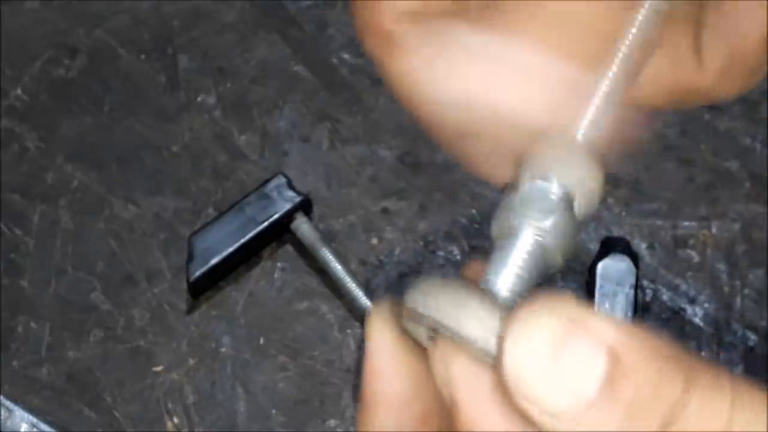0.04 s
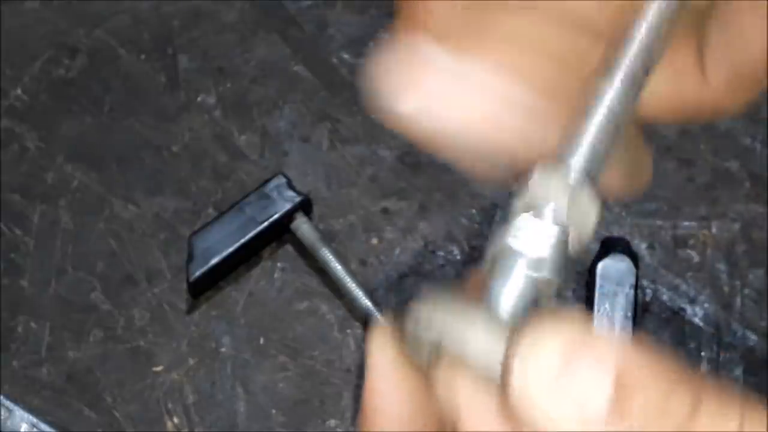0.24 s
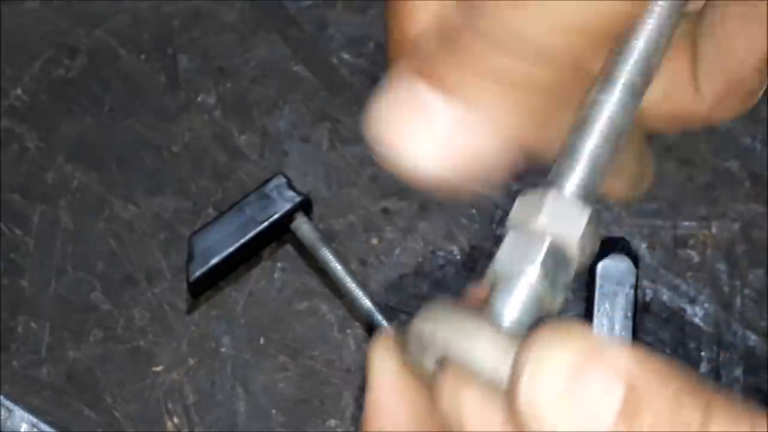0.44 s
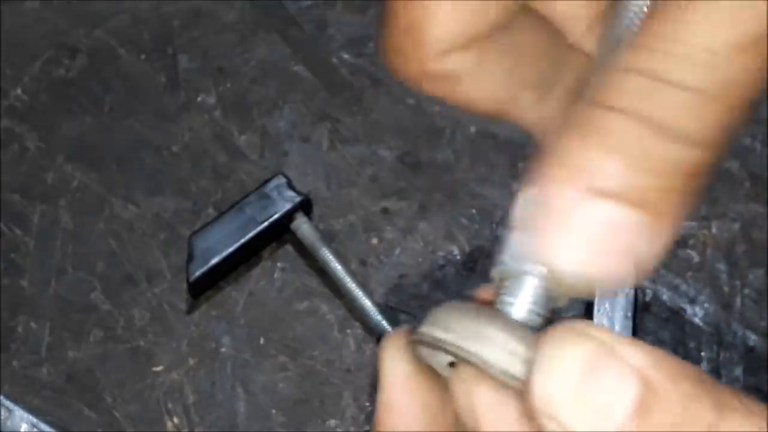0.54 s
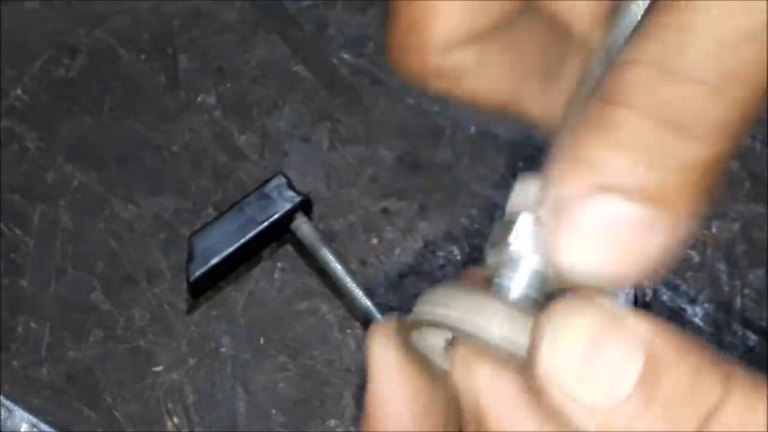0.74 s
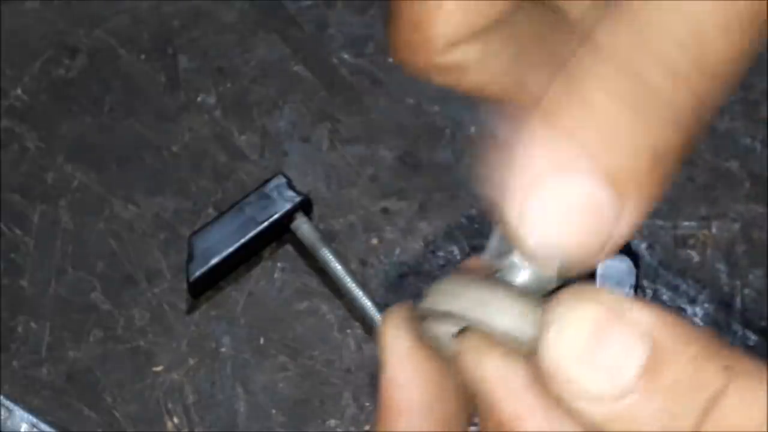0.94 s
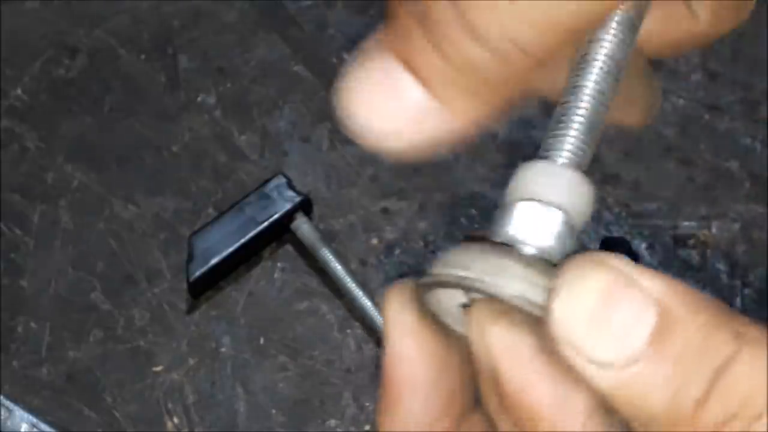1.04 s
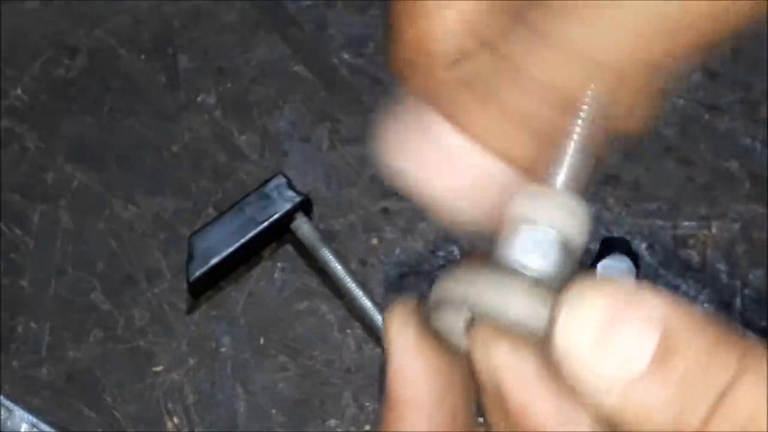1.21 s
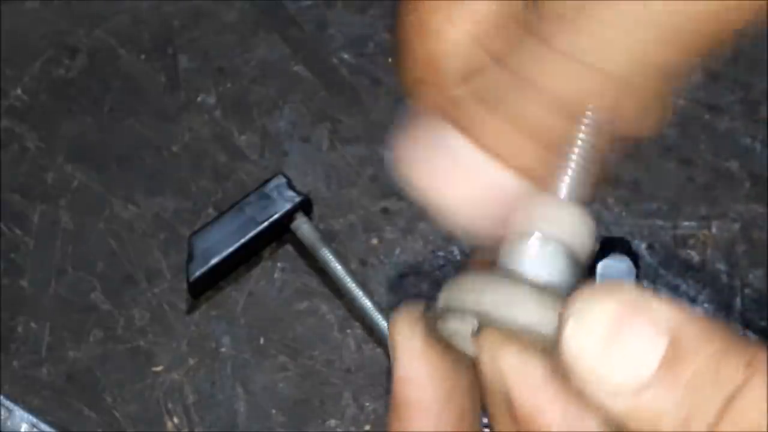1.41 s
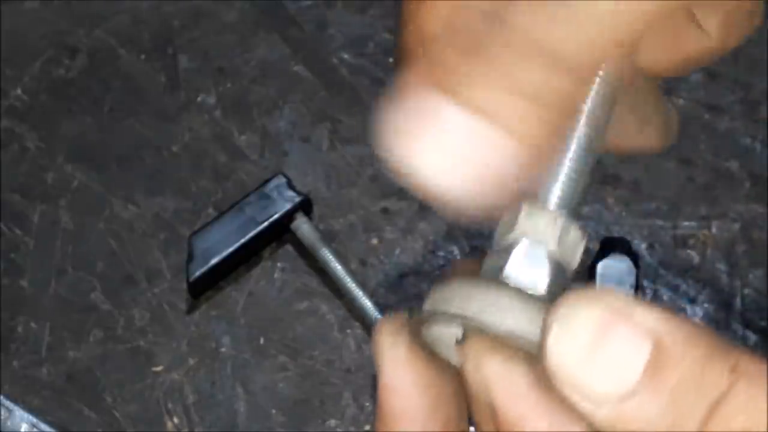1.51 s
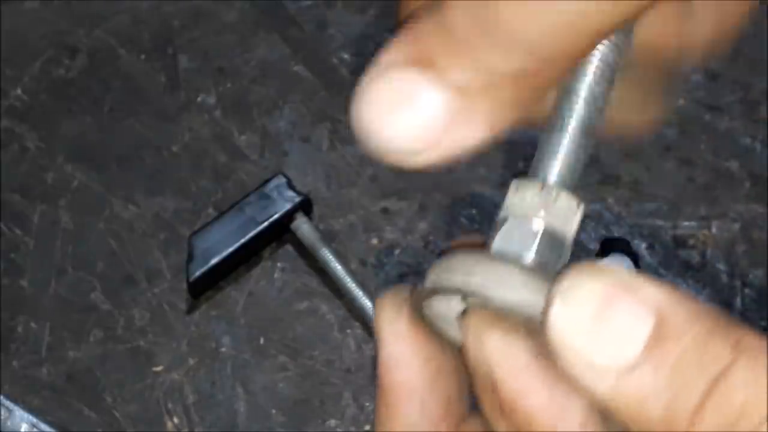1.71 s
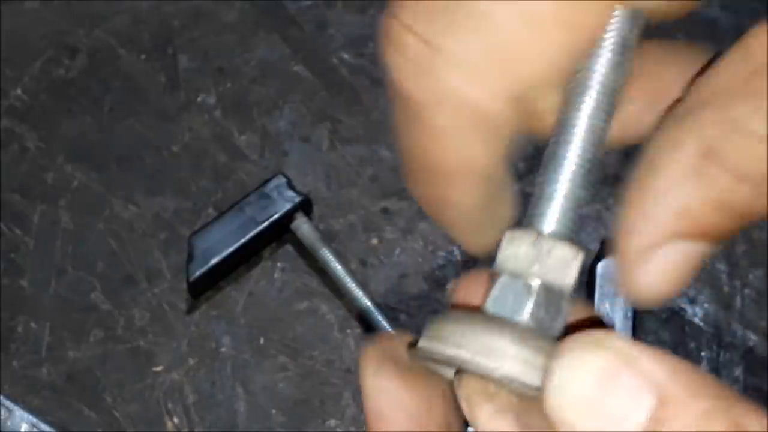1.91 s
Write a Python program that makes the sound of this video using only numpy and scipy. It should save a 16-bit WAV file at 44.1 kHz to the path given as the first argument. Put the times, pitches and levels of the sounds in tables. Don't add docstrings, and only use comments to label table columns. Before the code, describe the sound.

A steel nut flicked around a threaded rod clicks and rattles sharply, close up, then quiets

```python
import sys
import numpy as np
from scipy import signal
from scipy.io import wavfile
from scipy.ndimage import uniform_filter1d

SR = 44100
rng = np.random.default_rng(int(sys.argv[2]) if len(sys.argv) > 2 else 0)


def log_audio(samples):
    frames = np.atleast_2d(samples).T
    limited = np.clip(frames, -1, 1)
    pcm = np.round(limited * 32767).astype(np.int16)
    wavfile.write(sys.argv[1], SR, pcm)


def field_ratio(decibels):
    return 10 ** (np.asarray(decibels, dtype=float) / 20)


N = 85995

# start_s, peak_db
TICKS = [(0.0004, -38), (0.0044, -33), (0.0074, -44.5), (0.0141, -33.5), (0.0249, -34), (0.0294, -41),
         (0.035, -49), (0.0412, -48), (0.0487, -43), (0.0554, -43), (0.0747, -37.5), (0.0814, -46),
         (0.087, -44), (0.103, -41.5), (0.1124, -43.5), (0.128, -46), (0.1572, -37), (0.164, -35.5),
         (0.172, -35.5), (0.1761, -34), (0.1824, -37.5), (0.1933, -31), (0.2464, -29.5), (0.6634, -32),
         (0.8156, -33.5), (0.824, -42.5), (0.9166, -30.5), (1.0176, -39), (1.0274, -40), (1.1124, -43),
         (1.4627, -40.5)]
# start_s, peak_db, length_s, tilt_db_per_octave, best_struck_mode_hz
KNOCKS = [(0.1333, -32.5, .001, -13, 3640), (0.2088, -24.5, 0.0027, -9.5, 11600),
          (0.22, -36, 0.0014, -10, 3460), (0.2237, -26.5, 0.0012, -5, 12000),
          (.2296, -19, 0.003, -0.5, 3480), (0.2324, -12, 0.0014, -1, 12200),
          (.2346, -10.5, 0.0018, -1.5, 11800), (.2362, -13, .001, -4, 7400),
          (.2385, -20, 0.0019, 0.5, 12000), (0.257, -31.5, 0.0016, -6, 7480),
          (.3915, -27, 0.0019, -6.5, 4300), (0.3982, -36, 0.00088, -11, 3840),
          (0.4, -36, 0.0011, -14, 11900), (.425, -42, .002, -7, 7600), (.4290, -27, 0.0018, -4, 11900),
          (.4372, -20, .001, -7, 7800), (.4385, 0, .0013, 3, 11970), (.4420, -18, 0.0018, -4.5, 7200),
          (0.4445, -20.5, 0.0012, -8, 3530), (.4512, -27, .002, -3, 11600), (0.643, -40, 0.0018, 10, 12000),
          (0.6473, -25.5, 0.00078, -2.5, 7300), (0.6493, -7, .001, 0, 4220), (0.652, -7.5, .0008, 2, 11770),
          (0.6544, -22.5, .0015, -1, 7400), (0.656, -30, 0.0021, 4, 3440), (.776, -39.5, 0.0028, -7, 4300),
          (0.8498, -27, .002, -3.5, 7300), (0.852, -36, 0.0011, -4, 3500), (.8658, -29, 0.0011, -3, 5960),
          (0.8908, -26, .001, -2, 3460), (0.8942, -22, 0.0012, -4.5, 7100),
          (0.8954, -10.5, .0009, -0.5, 7050), (0.8983, -17.5, 0.0017, 2, 4020), (0.901, -37, .001, 0, 7700),
          (0.9041, -20, 0.0005, -3.5, 7250), (0.9075, -31.5, 0.0011, -4, 7800),
          (1.23, -47, 0.0023, -9, 4030), (1.424, -33.5, .002, -4.5, 4200), (1.634, -54, .0016, -4.5, 4200)]
# middle_s, level_db, half_length_s, tilt_db_per_octave, skin_squeak_hz
SCUFFS = [(.005, -47, 0.01, -17, 5400), (0.169, -40, 0.008, -9.5, 7100), (0.343, -61, 0.0058, -23, 4180),
          (.392, -39.5, 0.0058, -9.5, 4370), (0.442, -26, 0.0029, -2, 5010),
          (0.649, -31.5, 0.0032, -5, 4180), (0.898, -28, .005, 0, 7070), (.600, -40, 0.0083, -6.5, 6750),
          (0.644, -43.5, 0.016, -9.5, 3630), (0.683, -48.5, .015, 11, 7900),
          (0.819, -41.5, 0.0093, -3, 6800), (0.853, -36.5, 0.0056, -4, 3520), (1.024, -46, 0.011, -6, 7000),
          (1.234, -46.5, 0.015, -7.5, 7200), (1.431, -48.5, 0.016, -6, 4130),
          (1.666, -57, 0.0049, 0.5, 7100), (1.774, -63, 0.0071, -3.5, 7750), (0.252, -58, 0.012, -8, 7360),
          (0.444, -39.5, 0.014, -16, 7500)]
# time_s, rattle_db
SPIN = [(0, -57.5), (.2, -70), (.3, -57.5), (.36, -68), (.46, -47), (.56, -62), (.66, -50), (.76, -63.5),
        (.88, -50), (1.0, -64), (1.2, -99.5)]
MODE_HZ = [3470, 4250, 5200, 6300, 7250, 7850, 9100, 11550, 12050, 12750, 15150]
# width_hz, level_db
MODES = [(280.5, -3.5), (356, -9), (345, -13.5), (500, -26), (420, -2.5), (360, -6), (497.5, -14.5),
         (402, -7.5), (261, 2), (500, -5.5), (860, -16)]
# pitch_hz, level_db
STEEL = [(1300, -54), (2200, -31.5), (3200, -11.5), (5500, -5.5), (8000, -3), (10300, -13), (12500, -8),
         (15500, -21)]
# pitch_hz, level_db, t60_s
ROD = [(698.5, -82, 3.4), (2117, -74, 1.6)]
# pitch_hz, t60_s
ROOM = [(1000, 0.56), (3500, 0.17), (7500, 0.27), (12000, 0.084), (15500, 0.32)]
# pitch_hz, level_db
RUMBLE = [(25, -14), (48, -29), (66, -5), (190, 2), (450, -7), (800, -17.5), (1600, -30.5), (2300, -60)]
# pitch_hz, level_db
HISS = [(2000, -12), (2900, -7), (3600, 5), (5500, -2.5), (7400, 1), (8600, -6.5), (10800, -2.5),
        (15500, -18.5)]
# time_s, traffic_db, hiss_db, hiss_tilt_db_per_octave
WASH = [(0, 9, 11, -37), (.2, 5, 6, -12), (.35, 6.5, 3, -28), (.55, 4, -3, 6.5), (.75, 4, -3, -2.5),
        (1.0, 0.5, 5, 0), (1.25, 3.5, 4, 1.5), (1.4, 4.5, 0, 11), (1.6, 1, -0.5, 0.5),
        (1.721, 5, 0.5, -18.5), (1.85, 7.5, -1.5, -29.5), (1.95, 6.5, 3.5, -18)]
# time_s, tilt_db_per_octave
NEARING = [
    (0, -2),
    (.4, -2.5),
    (1.2, 2.5),
    (1.95, -0.3),
]
# start_s, length_s, start_hz, end_hz, level_db
DRONES = [
    (1.17, 0.13, 500, 430, -59.5),
    (.72, .13, 452, 482, -65.5),
    (1.28, 0.1, 457, 480, -64),
    (1.3, 0.21, 200, 259, -59),
    (1.7, 0.25, 1267, 1287, -66),
    (1.68, 0.18, 255.4, 257, -58),
    (.22, 0.065, 1340, 1210, -68),
    (0.0313, 0.16, 187, 217.4, -57.5),
]
# start_s, length_s, start_hz, end_hz, level_db
BIRDS = [
    (1.056, 0.23, 7030, 3640, -66.5),
    (1.29, 0.25, 7000, 3620, -63.5),
    (1.529, 0.25, 7000, 3590, -64.5),
    (1.803, 0.18, 4440, 5250, -63.5),
    (1.924, .08, 8700, 11600, -74),
]
# start_s, length_s, start_hz, end_hz, level_db
TRILLS = [
    (1.06, 0.15, 6600, 5000, -67),
    (1.301, 0.28, 6660, 4900, -68.5),
    (1.544, 0.21, 6600, 5200, -65.5),
    (1.207, 0.056, 3710, 3540, -59),
    (1.408, 0.075, 3580, 3760, -66),
    (1.629, 0.15, 3710, 3610, -66),
]

STEEL_DB, PIVOT_HZ, EDGE_HZ = 8.5, 7000, 15360
SPREAD_DB, DETUNE = 1.5, .004
SQUEAK_WIDTH_HZ = 404
GRIT_DB, KNOCK_GRIT_DB = 3, 1.5
TICK_S, TICK_TILT_DB = 0.00098, -6.5
BEST_MODE_DB, BLOW, RISE = 0.5, 2.14, 0.69
CEILING_DB, DULLEST_DB = 2.8, -7
SQUEAK_DB, SKIN_DB = 3, -7
ROD_BLUR_HZ = 13.8
THUMP_DB, THUMP_HZ, THUMP_WIDTH_HZ = -38, 1000, 800
ROOM_DB, ECHO_DB, WALL_S = -14, 7, .011
RUMBLE_DB, HISS_DB = -61.5, -61
WOBBLE = .1
SETTLE, BLUR_HZ, TRILL_HZ = 1.7, 393, 750
LOW_CUT_HZ, SELF_NOISE_DB = 60, -78.5


def evened(x):
    return x / np.sqrt(np.mean(x ** 2) + 1e-20)


def read(points, hz):
    f, value = np.transpose(points)
    return np.interp(np.log(hz + 1), np.log(f + 1), value)


def add(mix, s, sound):
    part = mix[max(round(s * SR), 0):][:len(sound)]
    part += sound[:len(part)]


def resonate(x, hz, width):
    turn = np.exp(2j * np.pi * np.cumsum(hz * np.ones(len(x))) / SR)
    r = np.exp(-np.pi * width / SR)
    return 2 * (turn * signal.lfilter([1 - r], [1, -r], x / turn + 1e-18)).real


def causal(gain_db):
    log = np.log(field_ratio(np.r_[gain_db, gain_db[-2:0:-1]]))
    minimum_phase = np.exp(log - 1j * signal.hilbert(log).imag)
    return np.fft.ifft(minimum_phase).real[:len(gain_db)]


def peak(hz, centre, width):
    return 1 + (2 * (hz - centre) / width) ** 2


def steel(drive, tilt_db, squeak_hz=4300, squeak_db=-60, damp_db=0):
    hz = np.fft.rfftfreq(2048, 1 / SR)
    grip = rng.standard_normal((len(MODES), 2))
    power = field_ratio(read(STEEL, hz) + STEEL_DB - 15.5) ** 2
    for f, (width, db), (louder, sharper) in zip(MODE_HZ, MODES, grip):
        gain = field_ratio(db + damp_db + SPREAD_DB * louder)
        power = power + gain ** 2 / peak(hz, f * (1 + DETUNE * sharper), width) ** 2
    tilt = tilt_db * np.log2((hz + 500) / PIVOT_HZ)
    colour = field_ratio(10 * np.log10(power) + tilt) ** 2
    squeak = field_ratio(squeak_db) ** 2 / peak(hz, squeak_hz, SQUEAK_WIDTH_HZ) ** 2
    colour = colour + colour.max() * squeak
    colour = colour / (1 + (hz / EDGE_HZ) ** 40)
    return signal.fftconvolve(drive, causal(10 * np.log10(colour)))


def grit(size, db=GRIT_DB):
    strength = np.repeat(rng.standard_normal(size // 16 + 1), 16)[:size]
    return rng.standard_normal(size) * field_ratio(db * strength)


def knocks():
    out, t = np.zeros(N), np.arange(2000) / SR
    ticks = [(s, db, TICK_S, TICK_TILT_DB, rng.choice(MODE_HZ[::4])) for s, db in TICKS]
    for s, db, length, tilt_db, hz in [*KNOCKS, *ticks]:
        u = t / max(length, 2e-4)
        force = grit(2000, KNOCK_GRIT_DB) * np.minimum(u / RISE, 1) * np.exp(-u ** 1.09)
        force[round(RISE * length * SR)] += BLOW
        sound = steel(force, max(tilt_db, DULLEST_DB), hz, BEST_MODE_DB)
        add(out, s, field_ratio(min(db, CEILING_DB)) * sound / abs(sound).max())
    return out


def rod():
    out, blows, t = np.zeros(N), np.zeros(N), np.arange(N) / SR
    for s, db, *_ in [*KNOCKS, *TICKS]:
        add(blows, s, field_ratio(np.array([db])))
    for hz, db, t60 in ROD:
        shimmer = evened(resonate(rng.standard_normal(N), hz, ROD_BLUR_HZ))
        out += shimmer * signal.fftconvolve(blows, field_ratio(db - 60 * t / t60))[:N]
    thump = resonate(blows ** 2, THUMP_HZ, THUMP_WIDTH_HZ)
    return out + field_ratio(THUMP_DB) * thump / abs(thump).max()


def spin():
    level_db = np.interp(np.arange(N) / SR, *np.transpose(SPIN))
    return evened(steel(grit(N), -4.0)[:N]) * field_ratio(level_db)


def scuffs():
    out, middle = np.zeros(N), .05
    for s, db, half, tilt_db, hz in SCUFFS:
        shape = np.exp(-((np.arange(4410) / SR - middle) / half) ** 2)
        sound = steel(grit(4410), tilt_db, hz, SQUEAK_DB, SKIN_DB)[:4410]
        cut = max(round((middle - s) * SR), 0)
        add(out, s - middle, (field_ratio(db) * evened(sound) * shape)[cut:])
    return out


def room(x):
    taps = np.zeros(SR // 2)
    at = np.arange(300, len(taps) - 20, 20) + rng.integers(0, 20, (len(taps) - 301) // 20)
    taps[at] = rng.choice([-1., 1.], len(at))
    hz, t, z = signal.stft(taps, SR, nperseg=256)
    decay = field_ratio(-60 * t / read(ROOM, hz)[:, None])
    tail = signal.istft(z * decay, SR, nperseg=256)[1]
    tail = tail * np.clip(np.arange(len(tail)) / SR / WALL_S, 0, 1) ** 3
    return signal.fftconvolve(x, tail / np.linalg.norm(tail))[:N]


def wash(colour, level_db, tilt_db, patchy_db, pivot_hz):
    frames, hz = N // 256 + 5, np.fft.rfftfreq(1024, 1 / SR)
    a, b, patches = rng.standard_normal((frames, 513, 3)).T
    patches = evened(uniform_filter1d(uniform_filter1d(patches, 10, 0), 12, 1))
    octaves = np.log2(np.maximum(hz / pivot_hz, 1))[:, None]
    lean = octaves * np.interp(np.arange(frames) * 256, np.arange(N), tilt_db)
    spectra = (a + 1j * b) * field_ratio(read(colour, hz)[:, None] + patchy_db * patches + lean)
    noise = signal.istft(spectra, nperseg=1024, noverlap=768)[1][:N]
    return field_ratio(level_db) * evened(noise)


def street():
    s, columns = np.arange(N) / SR, np.transpose(WASH)
    traffic_db, hiss_db, tilt_db = (np.interp(s, columns[0], c) for c in columns[1:])
    nearing_db = np.interp(s, *np.transpose(NEARING))
    traffic = wash([*RUMBLE, (4000, -76.5)], RUMBLE_DB + traffic_db, nearing_db, 1.42, 250)
    return traffic + wash([(900, -38.5), *HISS], HISS_DB + hiss_db, tilt_db, 0.71, 7340)


def glide(length, from_hz, to_hz, db, width, bend):
    u = np.arange(round(length * SR)) / (length * SR)
    hz = to_hz + (from_hz - to_hz) * np.maximum(1 - bend * u, 0)
    air = rng.standard_normal(30000)[:len(u)]
    air = resonate(resonate(air, hz, width), hz, width)
    return field_ratio(db) * evened(air) * np.sqrt(np.sin(np.pi * u ** 0.68) + 1e-9)


def drones():
    out = np.zeros(N)
    for start, length, a, b, db in DRONES:
        add(out, start, glide(length, a, b, db, 12 + WOBBLE * a * (a / 1300), 1))
    return out


def birds():
    out = np.zeros(N)
    for start, length, a, b, db in BIRDS:
        add(out, start, glide(length, a, b, db, BLUR_HZ, SETTLE))
    for start, length, a, b, db in TRILLS:
        add(out, start, glide(length, a, b, db, TRILL_HZ * (a / 6600) ** 2, 1))
    return out + field_ratio(ECHO_DB) * room(out)


def scene():
    near = knocks() + rod() + spin() + scuffs()
    outside = street() + drones() + birds()
    return (near + field_ratio(ROOM_DB) * room(near) + outside)[None]


def top_cut(x):
    return signal.sosfilt(signal.butter(12, 16190, fs=SR, output="sos"), x)


def record(dry):
    noisy = dry + field_ratio(SELF_NOISE_DB) * rng.standard_normal(dry.shape)
    low_cut = signal.butter(3, LOW_CUT_HZ, "high", fs=SR, output="sos")
    edge = signal.firwin(255, EDGE_HZ, window=("kaiser", 8), fs=SR)[None]
    heard = signal.oaconvolve(signal.sosfilt(low_cut, noisy), edge, "same")
    return top_cut(np.clip(heard, -1, 1))


dry = scene()
out = record(dry)
log_audio(out)
```